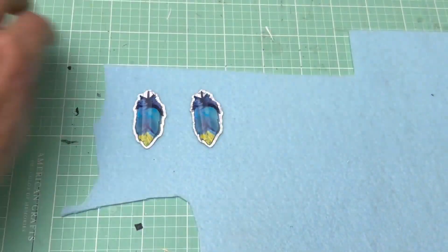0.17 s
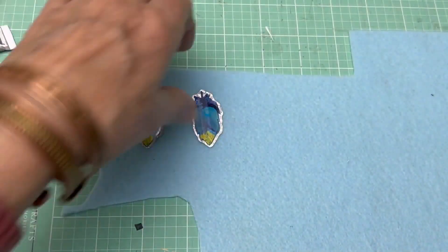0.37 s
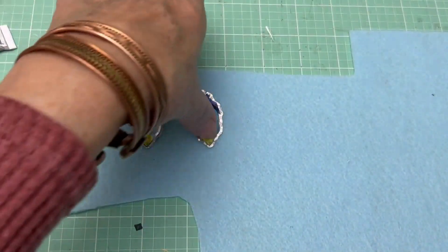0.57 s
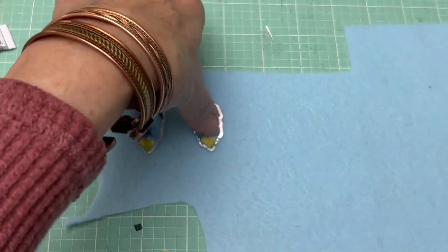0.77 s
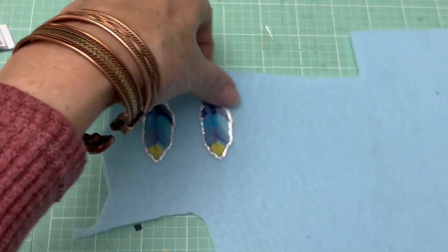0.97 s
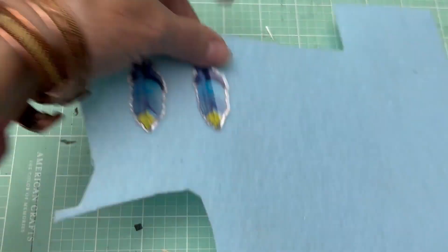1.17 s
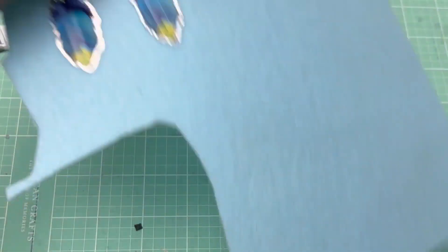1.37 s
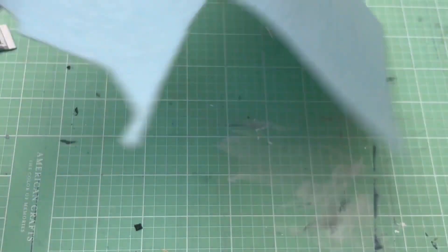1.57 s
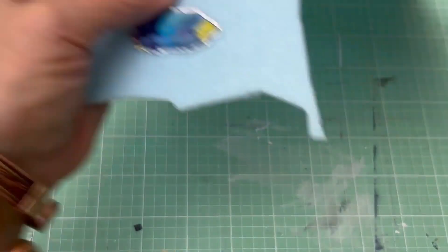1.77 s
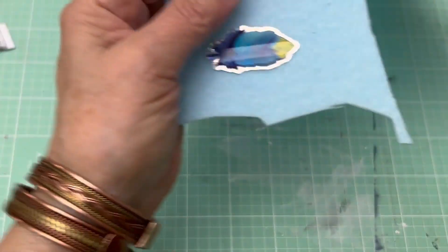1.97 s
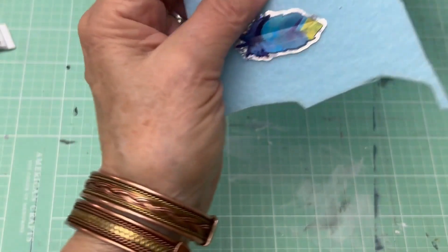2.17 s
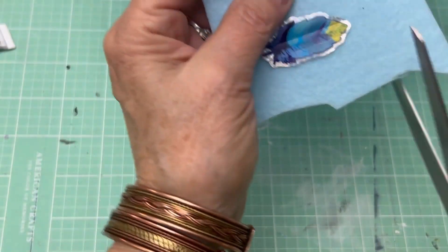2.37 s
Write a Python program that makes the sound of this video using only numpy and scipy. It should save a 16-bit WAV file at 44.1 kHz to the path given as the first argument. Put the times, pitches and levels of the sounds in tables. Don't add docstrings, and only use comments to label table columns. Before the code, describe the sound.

A stiff felt sheet is brushed, slid and lifted from a cutting mat with very soft swishes, after a sharp tool clack at the start; bangles tick and fingers thump, close up in a small quiet room.

```python
import sys
import numpy as np
from scipy import signal
from scipy.fft import rfft, irfft, next_fast_len
from scipy.io import wavfile
from scipy.ndimage import map_coordinates

SR = 44100
rng = np.random.default_rng(int(sys.argv[2]) if len(sys.argv) > 2 else 0)


def master_out(mix):
    frames = np.transpose(np.atleast_2d(mix))
    ceiling = np.clip(frames, -1, 1)
    pcm = np.round(ceiling * 32767).astype(np.int16)
    wavfile.write(sys.argv[1], SR, pcm)


def volts_from_db(level):
    exponent = np.asarray(level, float) / 20
    return 10 ** exponent


N = 106457
T = np.arange(N) / SR


def unit(x):
    return x / np.sqrt(np.mean(x ** 2) + 1e-20)


def along(points, hz):
    f, v = np.transpose(points)
    return np.interp(np.log(hz + 1), np.log(f + 1), v)


def wobble(rate):
    return map_coordinates(rng.standard_normal(2000), [T * rate], mode="wrap")


def filtered(x, response):
    m = next_fast_len(x.shape[-1] + SR // 2)
    spectrum = rfft(x, m) * response(np.fft.rfftfreq(m, 1 / SR))
    return irfft(spectrum, m)[..., :x.shape[-1]]


def resonance(hz, width_hz):
    return lambda f: (1j * f * width_hz / (hz * hz - f * f + 1j * f * width_hz)) ** 2


def add(track, s, x):
    part = track[max(round(s * SR), 0):][:len(x)]
    part += x[:len(part)]


def ring(modes, rise_s, tilt_db, scatter_db):
    t = T[:SR // 2]
    out = np.zeros(len(t))
    for hz, db, t60 in modes:
        level_db = db + tilt_db * np.log2(hz / 200) + scatter_db * rng.normal()
        out += volts_from_db(level_db - 60 * t / t60) * np.sin(2 * np.pi * hz * t)
    return (1 - np.exp(-t / rise_s)) * out


def stroke(length, peak, colour):
    swish = unit(filtered(rng.standard_normal(SR // 2), colour))
    swell = np.interp(T[:SR // 2] / length, [0, np.clip(peak, .05, .95), 1], [0, 1, 0])
    return swish * swell ** 0.9


# f/Hz, likeness [1 = same]
LIKENESS = [(60, 1), (300, 0.92), (700, 0.5), (1400, 0.55), (2300, 1), (4500, 1), (8500, 0.97), (15000, 1)]


def pair(spectrum):
    def response(f):
        turn = np.arccos(np.clip(along(LIKENESS, f), -1, 1)) / 2
        return volts_from_db(along(spectrum, f)) * [np.cos(turn), np.sin(turn)]
    return response


def beside(x, lag_s):
    later = np.roll(x, round(lag_s * SR))
    mid, side = filtered(np.array([x, later]), pair([(1, 0.0054)]))
    return np.array([mid + side, mid - side])


# f/Hz, level/dB per Hz
AIR_COLOUR = [(18, -27.5), (55, 1.5), (130, -4.5), (300, -10.5), (900, -15.5), (2200, -26), (5000, -39),
              (16000, -41.5)]
# t/s, level/dB
AIR_LEVEL = [(0, -76), (.06, -67), (.3, -67.5), (1.05, -68), (1.6, -67), (1.78, -69), (2.1, -65),
             (2.41, -66.5)]


def air():
    mid, side = filtered(rng.standard_normal((2, N)), pair(AIR_COLOUR))
    sway_db = 1.6 * wobble(9.1) + 1.4 * wobble(38)
    level_db = np.interp(T, *np.transpose(AIR_LEVEL)) + sway_db
    return unit(np.array([mid + side, mid - side])) * volts_from_db(level_db)


# t/s, peak level/dB, ring f/Hz, t60/s, hiss level/dB
TICKS = [(0.0512, -37.5, 2170, 0.0052, 15), (0.0596, -40, 2900, 0.031, 10), (0.1502, -31, 6160, 0.016, 0),
         (0.3, -43, 1262, 0.04, -24.5), (0.3204, -56.5, 7650, 0.048, 11.5), (0.4482, -54, 1796, 0.027, -8),
         (0.825, -60, 5370, 0.028, 3), (0.895, -49.5, 2500, 0.0047, -15.5), (1.8702, -50, 3000, 0.013, 10),
         (1.112, -48, 980, 0.0052, 12), (1.384, -50, 550, 0.025, -5.5), (0.614, -64.5, 7060, 0.0073, 7.5),
         (1.639, -50, 1800, 0.056, 1.5), (1.851, -49.5, 7550, 0.019, 12.5), (1.92, -59, 6900, 0.0081, 12.5),
         (1.9409, -24.5, 7050, .02, -24.5), (1.9409, -30, 4880, 0.097, -21), (2.0291, -36, 1536, 0.15, -14),
         (2.036, -45.5, 1700, 0.042, -8), (2.1347, -47.5, 6530, 0.0074, 10), (2.136, -52.5, 2024, 0.03, -3),
         (2.2208, -47.5, 5480, 0.0091, 7.5), (2.268, -61, 7460, 0.0076, 4),
         (2.277, -62.5, 7550, 0.008, 3.5)]
RING_CYCLES = 45


def ticks():
    out, t = np.zeros(N), T[:SR // 10]
    for s, db, hz, t60, hiss_db in TICKS:
        a, b = rng.standard_normal((2, len(t)))
        crack = volts_from_db(-60 * t / t60) * (1 - np.exp(-t / .0003))
        body = unit(filtered(a, resonance(hz, hz / 3.5)))
        tone = crack * volts_from_db(-60 * t * hz / RING_CYCLES) * (np.sin(2 * np.pi * hz * t) + 0.5 * body)
        hiss = unit(filtered(b, resonance(np.sqrt(hz * 8000), 2.6 * hz + 1200)))
        add(out, s, volts_from_db(db) * (tone + volts_from_db(hiss_db - 5.5 - 60 * t / 0.018) * crack * hiss))
    return out


# t/s, peak level/dB, first f/Hz, last f/Hz, t60/s
KNOCKS = [(.0515, -39, 617, 459, 0.044), (.0525, -47.5, 260, 233, 0.074), (.060, -38, 555, 460, 0.053),
          (.061, -43, 900, 820, .03), (.052, -50, 2030, 2000, .02), (.089, -31.5, 604, 438, .035),
          (.449, -49, 327, 120, 0.037), (0.8974, -44.5, 329.5, 55, 0.095), (1.111, -53, 401, 70.2, 0.059),
          (1.870, -37.5, 1112, 300, .04), (1.870, -40, 6800, 6470, 0.0073),
          (2.0296, -48, 3630, 3600, 0.011), (2.0293, -53, 5000, 5000, .01), (2.036, -49, 3700, 3700, 0.011),
          (2.036, -50, 4900, 4900, 0.011), (2.138, -51.5, 333, 228, 0.066), (.3, -57.5, 4780, 4750, .02),
          (.455, -62, 1852, 1793, 0.028), (.68, -57.5, 340, 320, 0.068), (2.035, -54, 332, 300, 0.077),
          (1.64, -57.5, 775, 759, .07)]
SINK_S, KNOCK_RISE_S = .006, .0008


def knocks():
    out, t = np.zeros(N), T[:SR // 5]
    for s, db, first_hz, last_hz, t60 in KNOCKS:
        turns = last_hz * t + (first_hz - last_hz) * SINK_S * (1 - np.exp(-t / SINK_S))
        swell = 1 - np.exp(-t / KNOCK_RISE_S)
        add(out, s, volts_from_db(db - 60 * t / t60) * swell * np.sin(2 * np.pi * turns))
    return out


# f/Hz, level/dB, t60/s
TOOL = [(550, -14, 0.025), (1092, -15.5, 0.013), (1918, -10.5, 0.017), (2236, -10.5, 0.021),
        (2780, -9, .012), (3615, 7.5, 0.004), (4710, -10.5, 0.01), (6400, -19, .008), (7900, -17, .008),
        (8510, -15.5, 0.0098), (10900, -18, 0.0033), (13860, -23.5, .008)]
# f/Hz, width/Hz, level/dB
BLOW = [(500, 740, 1.5), (1750, 290, 4.5), (2300, 1200, -4), (3500, 3000, -10)]
SNAP_S, SNAP_DB, SNAP_RISE_S = .0870, -10.5, 0.00024
SCRAPE_S, SCRAPE_HZ, SCRAPE_DB = .008, 1800, -41
CRACK_DB, CRACK_S = -3, 0.0056


def snap():
    near, blow = np.zeros((2, N))
    t = T[:round(SCRAPE_S * SR)]
    add(near, SNAP_S - SCRAPE_S, volts_from_db(SCRAPE_DB) * t / SCRAPE_S * np.sin(2 * np.pi * SCRAPE_HZ * t))
    t = T[:SR // 2]
    crack = unit(filtered(rng.standard_normal(len(t)), resonance(2600, 4000)))
    crack = crack * volts_from_db(CRACK_DB - 60 * t / CRACK_S) * (1 - np.exp(-t / SNAP_RISE_S))
    add(near, SNAP_S, volts_from_db(SNAP_DB) * ring(TOOL, SNAP_RISE_S, 0, scatter_db=0.5))
    add(near, SNAP_S, volts_from_db(SNAP_DB) * crack)

    def blow_colour(f):
        return sum(volts_from_db(db) * 1j * f * w / (c * c - f * f + 1j * f * w) for c, w, db in BLOW)
    blow[round(SNAP_S * SR)] = 4 * volts_from_db(SNAP_DB)
    return near, filtered(blow, blow_colour)


# t/s, length/s, level/dB, f/Hz, width/Hz
SCRAPES = [(1.176, 0.033, -72.5, 1750, 500), (1.236, 0.078, -76, 3110, 500),
           (1.427, 0.025, -73.5, 3100, 398), (1.607, 0.034, -75, 1800, 295),
           (1.809, 0.027, -53.5, 3800, 919), (1.817, 0.025, -58, 14200, 1520),
           (1.87, 0.014, -43.5, 1030, 678), (1.928, 0.013, -62.5, 5900, 500),
           (1.943, 0.0061, -53.5, 2480, 500), (1.943, 0.0072, -42, 4940, 800),
           (1.9433, 0.007, -38, 7270, 1510), (1.109, 0.0045, -45.5, 677, 708),
           (.088, 0.0081, -27, 550, 303)]
# t/s, length/s, level/dB, peak at share of length, tilt/dB per octave
STROKES = [(0.636, 0.13, -68, 0.41, -2.5), (0.755, 0.14, -72, 0.31, -4), (0.824, 0.14, -63.5, 0.57, 0.5),
           (1.06, 0.071, -58, 0.68, 2), (1.138, 0.43, -65.5, 0.13, 3), (1.369, 0.16, -65, 0.45, 2),
           (1.52, 0.088, -62, 0.085, 2), (1.595, 0.099, -60, 0.32, 1), (1.67, 0.1, -70.5, 0.36, 2),
           (1.751, 0.078, -66, 0.24, 1.5), (1.808, 0.051, -56.5, 0.15, 0), (1.869, .017, -40, 0.65, -0.5),
           (1.844, 0.079, -62, 0.17, -4.5), (2.108, 0.039, -61.5, 0.86, 1), (2.147, 0.24, -70, 0.41, -5.5),
           (2.297, 0.086, -70, 0.33, -3.5)]
# f/Hz, level/dB per Hz
FELT_COLOUR = [(150, -19.5), (600, -7), (1500, 1), (3000, -2.5), (6000, -0.5), (9000, -1.5), (12500, -9),
               (17000, -7)]
FIBRE_DB, FIBRES_PER_S = 2.2, 420


def felt():
    out = np.zeros(N)
    for s, length, db, peak, tilt_db in STROKES:
        def colour(f):
            return volts_from_db(along(FELT_COLOUR, f) + tilt_db * np.log2(f / 5000 + 0.017))
        add(out, s, volts_from_db(db) * stroke(length, peak, colour))
    for s, length, db, hz, width_hz in SCRAPES:
        add(out, s, volts_from_db(db) * stroke(length, .4, resonance(hz, 1.2 * width_hz)))
    return out * volts_from_db(FIBRE_DB * wobble(FIBRES_PER_S) + 0.5 * wobble(44.89))


# t/s, peak level/dB, brightness/dB per octave
THUMPS = [(0.0886, -32, 6.5), (0.452, -51.5, 4.5), (.6, -51, 2.5), (.903, -51.5, -0.5), (1.113, -52.5, -1),
          (1.38, -56, -3), (1.6, -55, -1), (1.871, -41.5, 14), (1.879, -30, 0.5), (2.138, -53.5, -3.5),
          (0.164, -53, -2.5), (1.481, -52, 3), (1.948, -44.5, 7)]
# f/Hz, level/dB, t60/s
TABLE = [(74.8, -10, 0.098), (109.2, 7, 0.068), (155, -2, 0.11), (212.6, -2.5, 0.081), (334, -2.5, 0.052),
         (436, -10, 0.042), (516, -15, .04), (767, -18, 0.032)]
TABLE_CUT_HZ = 60


def thumps():
    out = np.zeros(N)
    for s, db, tilt_db in THUMPS:
        add(out, s, volts_from_db(db - 3.5) * ring(TABLE, 0.0019, tilt_db, scatter_db=1.0))
    return filtered(out, lambda f: (1j * f / (TABLE_CUT_HZ + 1j * f)) ** 2)


# t/s, length/s, level/dB, f/Hz, width/Hz
HUMS = [
    (2.1, 0.38, -74.5, 2500, 320),
    (2.25, 0.22, -74, 1500, 600),
    (1.95, 0.17, -72.5, 4900, 500),
    (1.95, 0.12, -77, 7300, 500),
]


def hums():
    out = np.zeros(N)
    for s, length, db, hz, width_hz in HUMS:
        add(out, s, volts_from_db(db) * stroke(length, 0.28, resonance(hz, width_hz)))
    return out


# f/Hz, t60/s
ROOM_T60 = [(100, 0.96), (500, 0.35), (2000, 0.46), (6000, 0.4), (14000, 0.23)]
# f/Hz, level/dB
ROOM_COLOUR = [(60, -10), (500, 5), (1600, 1), (2500, -2), (5000, -4), (8000, -8), (15000, -8)]
ROOM_GAP_S = 0.0046


def room(x):
    hz, t, z = signal.stft(rng.standard_normal((2, SR // 2)), SR, nperseg=256)
    decay = volts_from_db(-60 * t / along(ROOM_T60, hz)[:, None])
    tail = signal.istft(z * decay, SR, nperseg=256)[1]
    mid, side = filtered(tail / np.linalg.norm(tail[0]), pair(ROOM_COLOUR))
    late = np.pad(x, (round(ROOM_GAP_S * SR), 0))
    return signal.fftconvolve(late[None], [mid + side, mid - side], axes=1)[:, :N]


SHEET_WIDTH_S, BOUNCE_S = .009, .0002
ROOM_DB, TAP_ROOM_DB, SNAP_ROOM_DB, RING_IN_ROOM_DB = -10.5, -1, -4.5, -14


def scene():
    sheet = felt()
    taps = ticks() + thumps() + knocks()
    tone, blow = snap()
    direct = beside(sheet, SHEET_WIDTH_S) + beside(taps + tone, BOUNCE_S)
    hands_in_room = volts_from_db(ROOM_DB) * room(sheet + volts_from_db(TAP_ROOM_DB) * taps)
    tool_in_room = volts_from_db(SNAP_ROOM_DB) * room(blow + volts_from_db(RING_IN_ROOM_DB) * tone)
    return direct + hands_in_room + tool_in_room + air() + beside(hums(), SHEET_WIDTH_S)


def roll_off(x):
    return signal.sosfilt(signal.butter(12, 16550, fs=SR, output="sos"), x)


# f/Hz, lead of the right/radians
RIGHT_LEADS = [(0, 0.24), (1400, 0.51), (2100, -1.2), (3000, -0.35), (4600, -0.66), (5500, 1), (6900, 0),
               (9800, np.pi), (13050, 2 * np.pi), (15700, 3 * np.pi), (16500, 3 * np.pi)]
PORT_HZ, PORT_WIDTH_HZ, PORT_DB, TOP_HZ = 13880, 4300, 5.5, 15800


def record(dry):
    def port(f):
        peak = volts_from_db(PORT_DB * np.exp(-((f - PORT_HZ) / PORT_WIDTH_HZ) ** 2))
        lead = np.interp(f, *np.transpose(RIGHT_LEADS))
        return peak / (1 + (f / TOP_HZ) ** 40) * np.exp(.5j * np.outer([-1, 1], lead))
    return roll_off(filtered(dry, port))


dry = scene()
out = record(dry)
master_out(out)
```